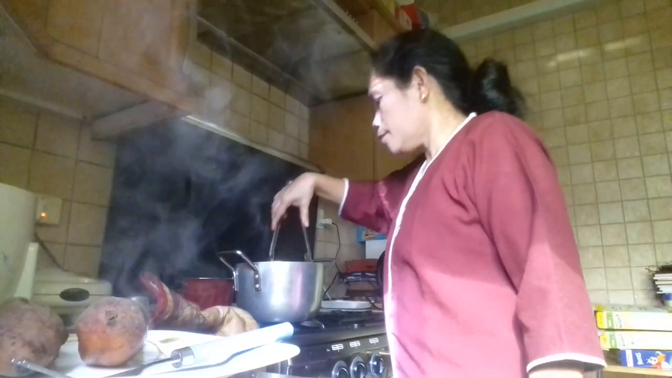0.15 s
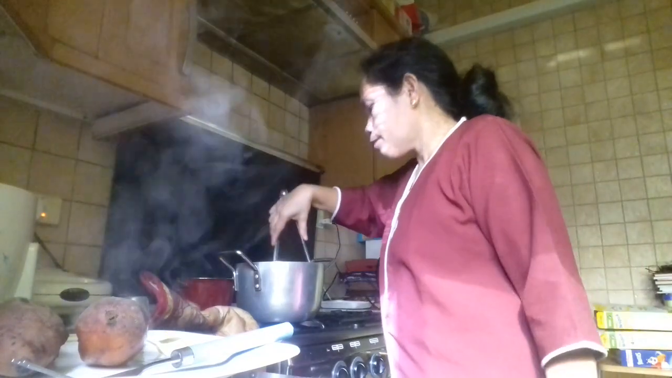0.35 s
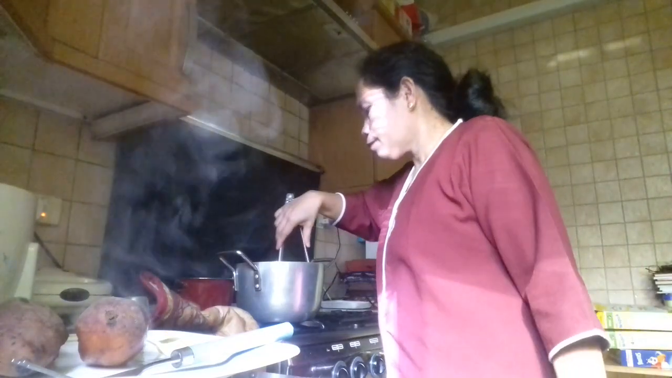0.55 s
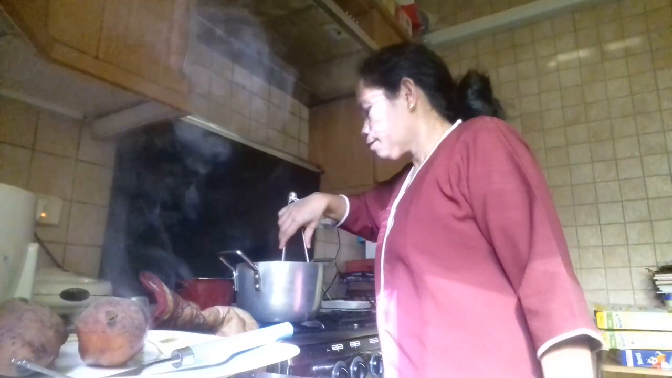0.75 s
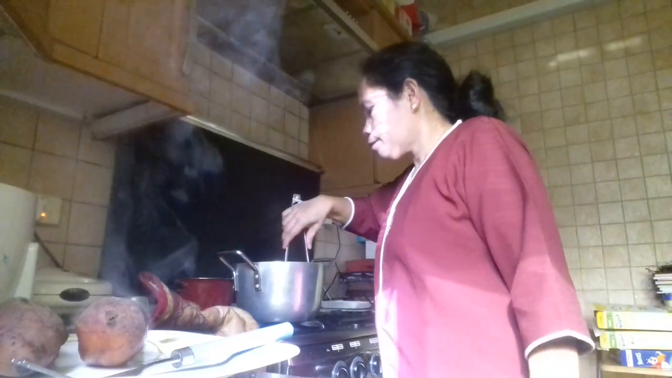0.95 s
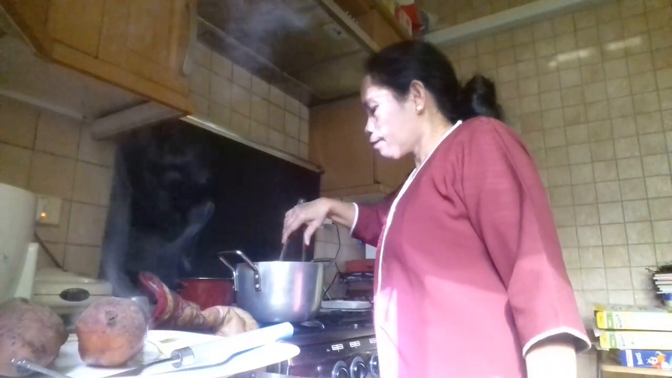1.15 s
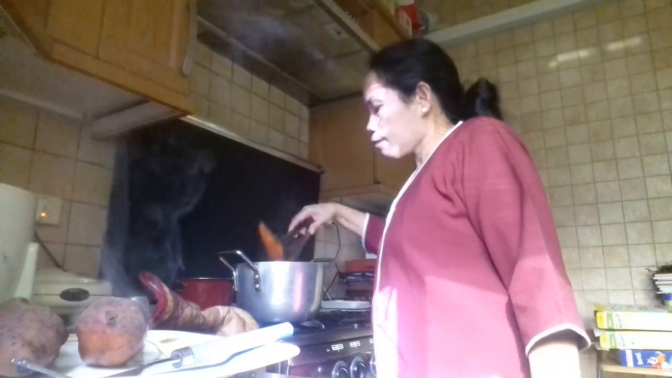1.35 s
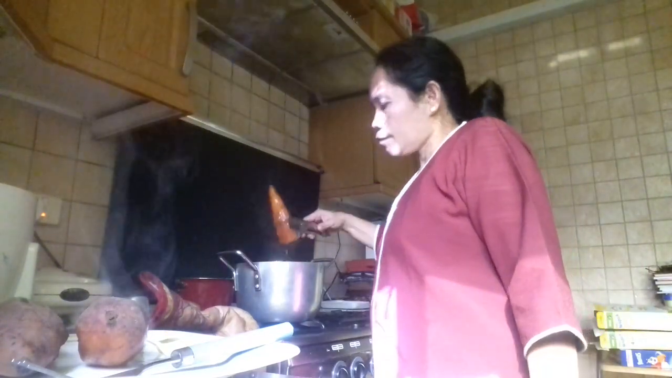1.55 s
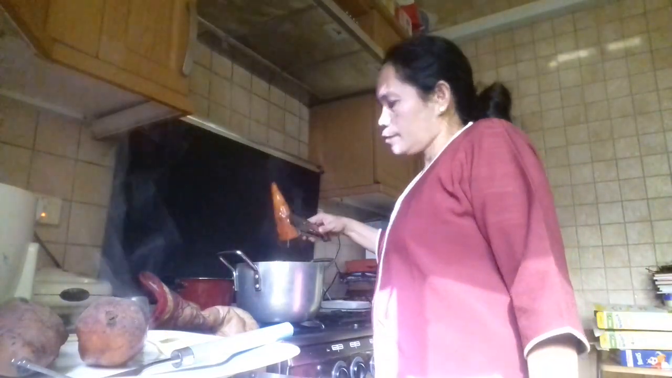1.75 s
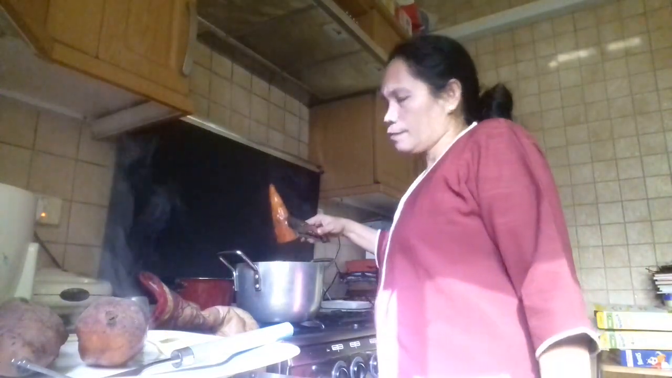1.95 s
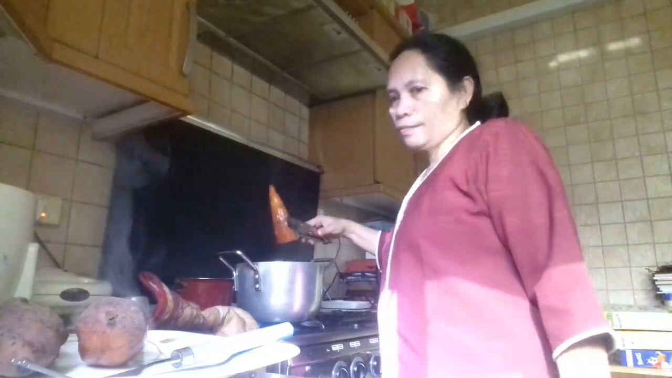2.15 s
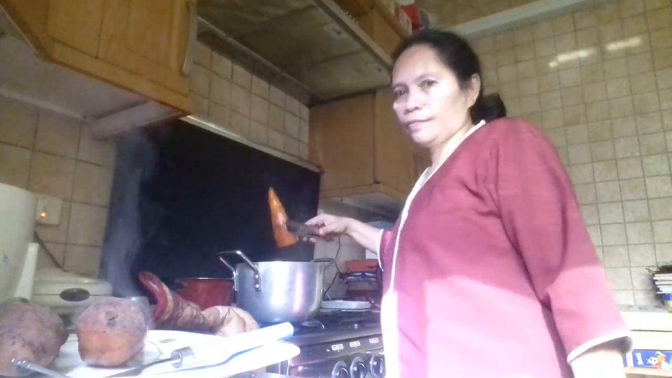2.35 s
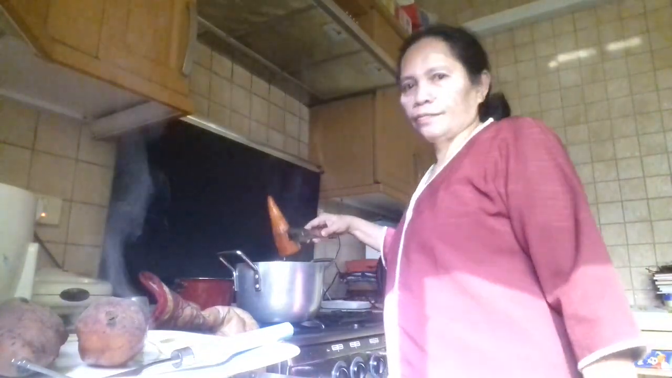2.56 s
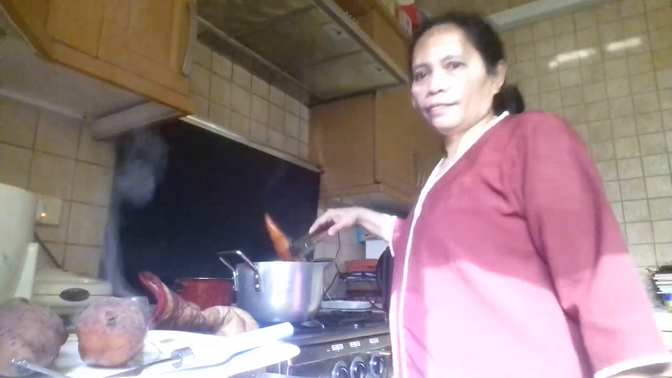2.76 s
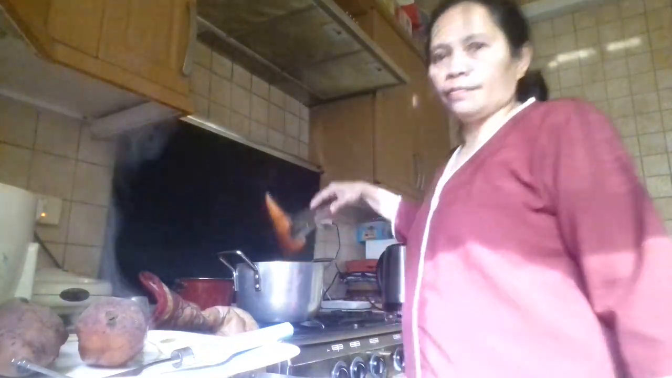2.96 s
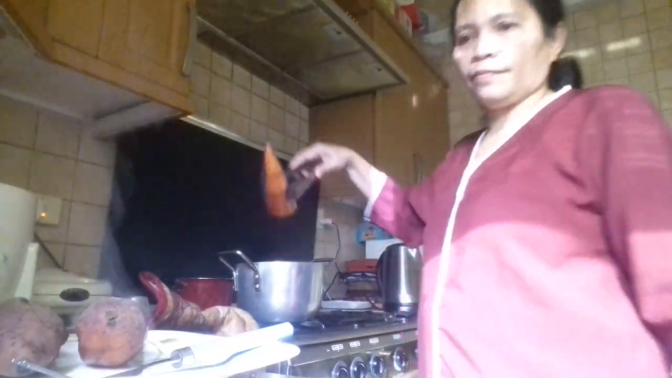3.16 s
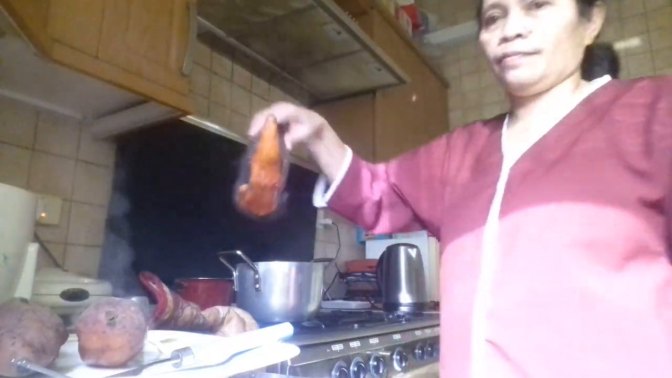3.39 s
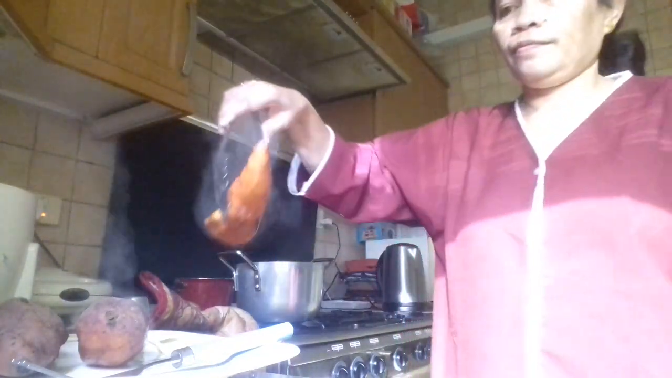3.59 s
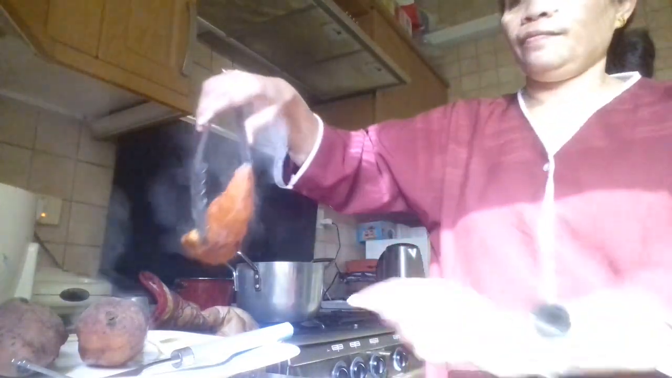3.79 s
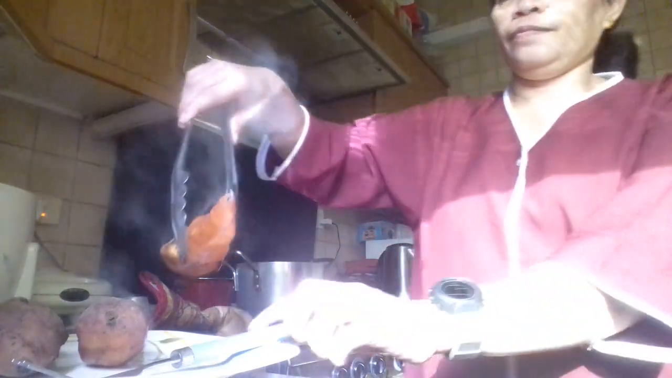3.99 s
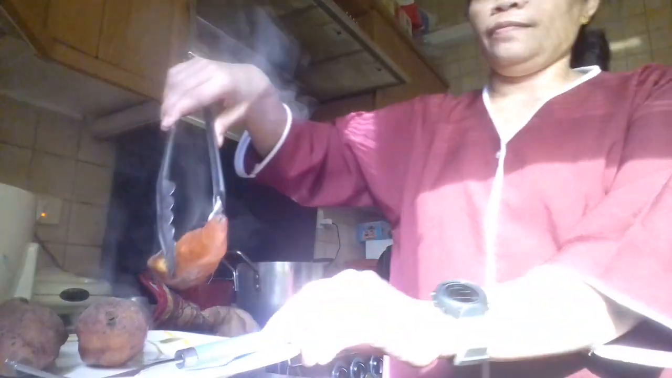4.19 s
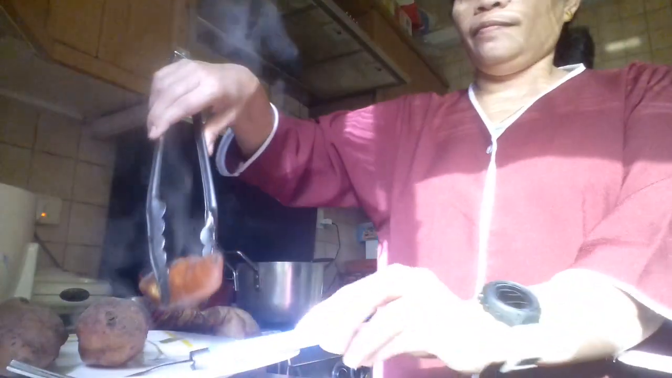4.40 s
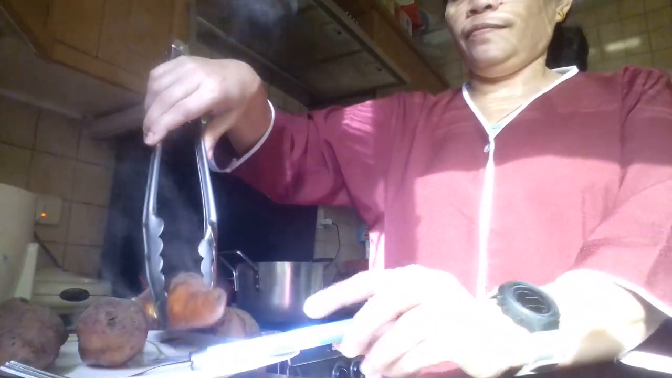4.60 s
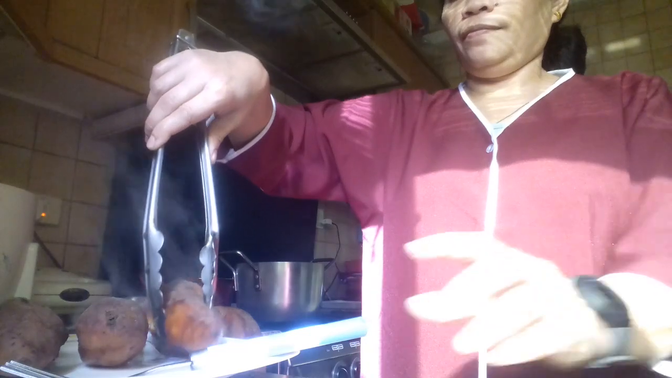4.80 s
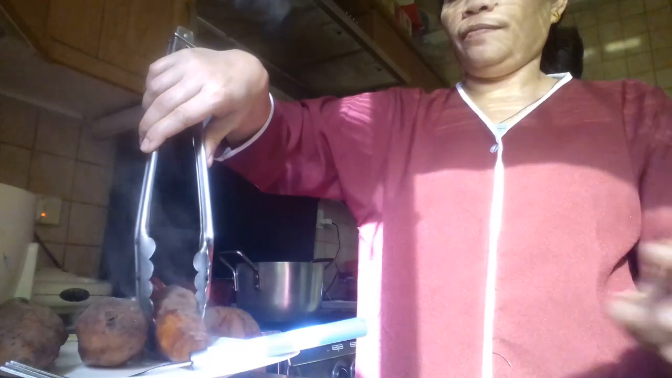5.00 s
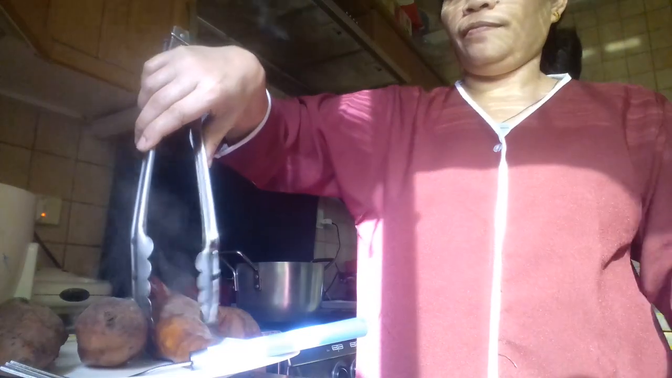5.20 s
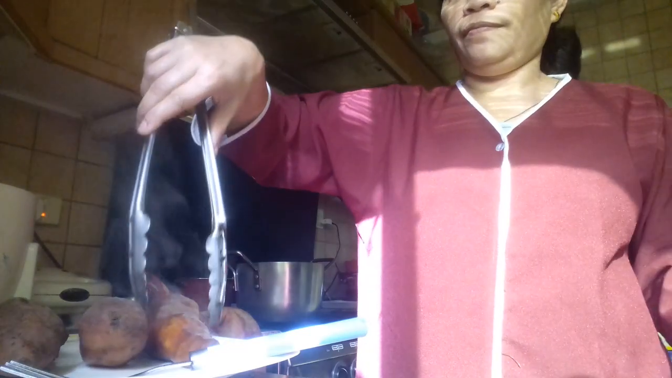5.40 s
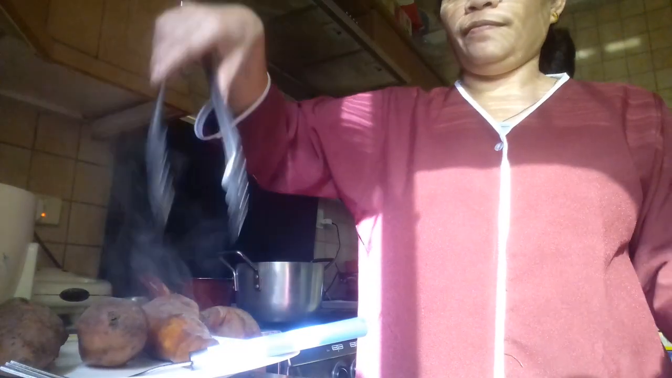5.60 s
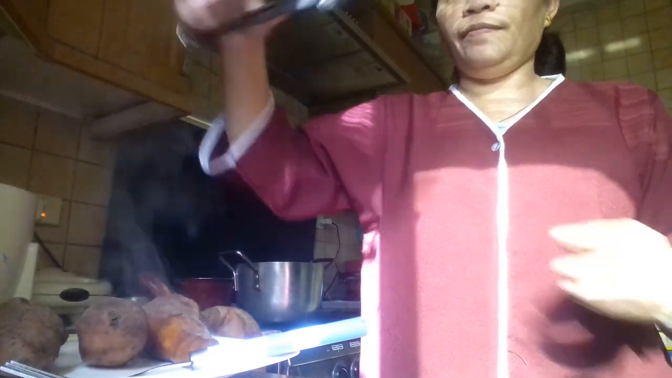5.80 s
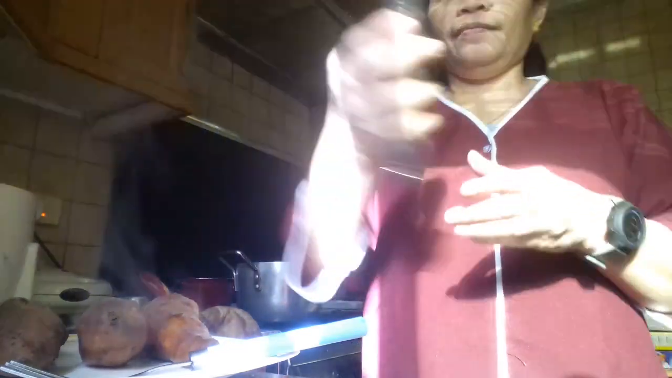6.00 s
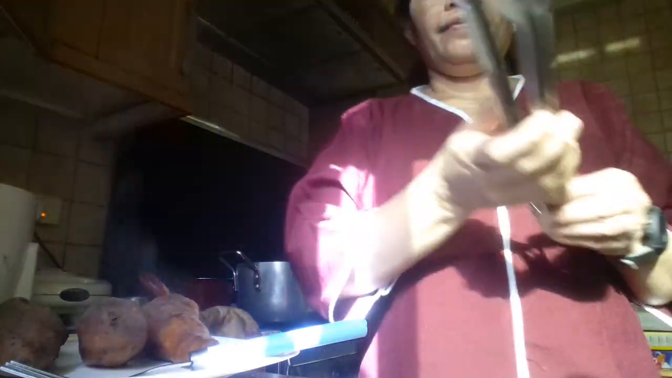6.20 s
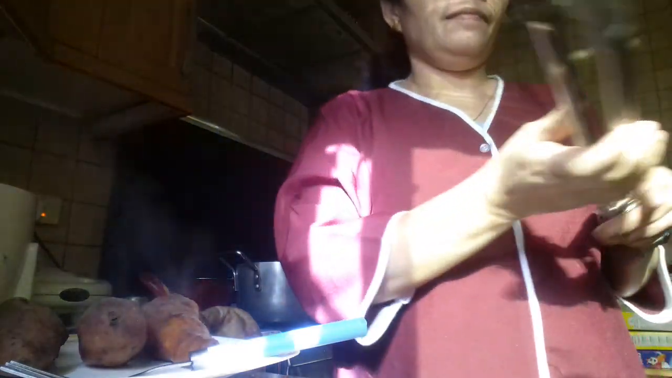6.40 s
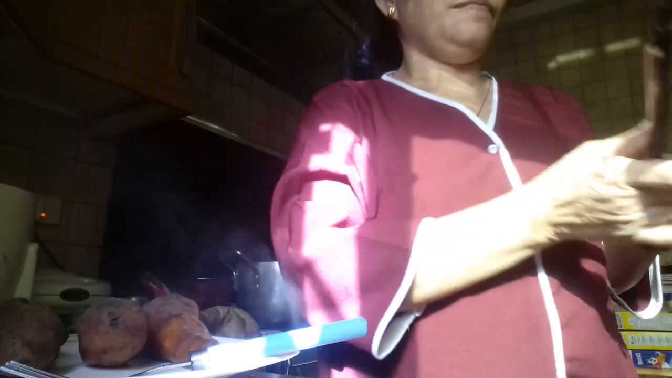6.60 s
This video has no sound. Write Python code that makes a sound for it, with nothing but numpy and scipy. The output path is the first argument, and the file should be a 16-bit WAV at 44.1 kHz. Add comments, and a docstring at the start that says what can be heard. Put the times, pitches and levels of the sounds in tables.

```python
"""A low hum and a soft hiss lie under all, with a faint rustle. First, steel tongs grope in a pot of hot water.
Something knocks dully near the stove; a hand slides a plate on the counter; food and tong tips land on it.
Last, the tongs are snapped shut and rattle. Each blow sums ringing modes, noisy clatter and a bright crack,
and a small hard kitchen answers it; the slide and the background are shaped noise."""
import sys
import numpy as np
from scipy import signal
from scipy.fft import rfft, irfft, next_fast_len
from scipy.io import wavfile
from scipy.ndimage import map_coordinates

SR = 44100
rng = np.random.default_rng(int(sys.argv[2]) if len(sys.argv) > 2 else 0)


def waveform_to_disk(signal):
    """Save audio, clipped to [-1, 1], as 16-bit WAV at the path in sys.argv[1]."""
    frames = np.transpose(np.atleast_2d(signal))
    scaled = np.clip(frames, -1, 1) * 32767
    samples = np.round(scaled).astype(np.int16)
    wavfile.write(sys.argv[1], SR, samples)


N = 293265

# Ringing modes of the plate, one column per mode; rows: f/Hz, relative level/dB, t60/s
PLATE_MODES = [
    [330, 620, 746, 942, 985, 1203, 1540, 1726, 1786, 1948, 1984, 2153, 2524, 2611, 3016, 3049, 3300, 3549,
     3666, 3840, 4247, 4462, 4528, 4850, 5636, 6896, 7052, 7900, 8403, 9959],
    [-25, -22, -19, -14, -17, -22, -21, -7, -9, -15, -16, -24, -13, -11, -17, -14, -24, -17, -1, -22, -21,
     -9, -8, -18, -30, -27, -31, -42, -42, -43],
    [.15, .15, .22, .16, .1, .12, .17, .11, .11, .15, .15, .17, .24, .2, .17, .19, .08, .16, .16, .16, .2,
     .17, .17, .14, .18, .16, .16, .08, .16, .17],
]


def amp(db):
    """Gain of a dB value."""
    return 10 ** (np.asarray(db) / 20)


def unit(x):
    """x scaled to rms 1."""
    return x / np.sqrt(np.mean(x ** 2) + 1e-20)


def along(points, hz):
    """Read a curve of (f/Hz, value) points at hz, in straight lines over log frequency."""
    f, value = np.transpose(points)
    return np.interp(np.log(hz + 1), np.log(f + 1), value)


def filtered(x, response):
    """x with its spectrum multiplied by a response of frequency."""
    n = x.shape[-1]
    padded = next_fast_len(n + 8192)
    spectrum = rfft(x, padded) * response(np.fft.rfftfreq(padded, 1 / SR))
    return irfft(spectrum, padded)[..., :n]


def pair(gain, alike):
    """Stereo noise of rms 1: a mid and a side noise, mixed for the wanted left-right likeness."""
    def mid_side_gain(hz):
        turn = np.arccos(np.clip(along(alike, hz), -1, 1)) / 2
        return gain(hz) * [np.cos(turn), np.sin(turn)]

    mid, side = filtered(rng.standard_normal((2, N)), mid_side_gain)
    return unit(np.array([mid + side, mid - side]))


def background():
    """A wavering hum, noise in a few narrow bands, over a smooth wide hiss."""
    # Hum bands: f/Hz, width/Hz, relative level/dB
    hum_bands = [(101.6, 48, -7.5), (161, 11, -3.5), (179.8, 28.5, 3.5), (209, 18, -9.5)]
    # Hiss spectrum: f/Hz, relative level/dB per Hz
    hiss_curve = [(24, -62), (40, -43), (87, -10.5), (133, -22), (144, -14), (167, 0), (220, -14.5),
                  (433, -13.5), (556, -17), (751, -16.5), (2910, -27.5), (4240, -27.5), (6020, -34),
                  (14800, -36), (16000, -35.5)]
    # Left-right likeness of the hiss: f/Hz, likeness/0-1
    likeness = [(60, 0.75), (180, 0.95), (550, 0.75), (1650, 0.33), (4970, 0.14), (15000, 0.064)]

    def hum_gain(f):
        return sum(amp(db) / (1 + (2 * (f - hz) / width) ** 2) for hz, width, db in hum_bands)

    hum = amp(-67.0) * pair(hum_gain, [(100, 1.0)])  # the same on both sides
    hiss = amp(-64) * pair(lambda f: amp(along(hiss_curve, f)), likeness)
    return hum + hiss


def walls(x):
    """The kitchen's diffuse answer: a new noise tail each time, every frequency dying at its own speed."""
    # Reverberation of the kitchen: f/Hz, t60/s
    room_decay = [(200, 0.49), (2000, 0.26), (6000, 0.34), (14000, 0.44)]
    hz, t, z = signal.stft(rng.standard_normal(SR // 3), SR, nperseg=256)
    fade = amp(-60 * t / along(room_decay, hz)[:, None])
    tail = signal.istft(z * fade, SR, nperseg=256)[1]
    delayed = np.pad(x, (400, 0))  # 9 ms before the first reflection
    return signal.fftconvolve(delayed, tail / np.linalg.norm(tail))


def struck(blows, touch, modes, noise, crack_db, room_db):
    """Each blow rings decaying modes, adds noisy clatter and a crack, and is answered by the walls."""
    medium_db = -40  # blow level at which the clatter settings hold unchanged
    out = np.zeros(N + SR)
    t = np.arange(SR // 3) / SR
    hz, level, t60 = np.array(modes)[:, :, None]
    for start, db, tilt_db, spot_hz, spot_db, rise, free in blows:
        clatter_db, clatter_t60 = np.reshape(touch, (2, 2)) @ [1, db - medium_db]

        def colour_gain(f):
            # where the blow lands tilts its sound and lifts or dips it around one pitch
            spot = np.exp(-(np.log((f + 1) / spot_hz) / 0.072) ** 2)
            return tilt_db * np.log2((f + 50) / 2000) + spot_db * spot

        gain = amp(level + colour_gain(hz))
        after = np.maximum(t - rise, 0)
        damped_t60 = t60 * np.clip(free, .05, 1)  # hand and food damp the ring
        scatter_db = rng.normal(0, 2.2, hz.shape)  # no two blows excite the modes alike
        fade = amp(scatter_db - 60 * after / damped_t60)
        tones = np.sin(2 * np.pi * (hz * t + rng.random(hz.shape)))
        ring = np.sum(gain * fade * tones, axis=0) / np.linalg.norm(gain)

        rattle = unit(filtered(rng.standard_normal(len(t)), lambda f: amp(along(noise, f) + colour_gain(f))))
        bright = unit(filtered(rattle, lambda f: (f / 4000) ** 0.36))
        crack = amp(crack_db - 60 * np.abs(t - rise) / 0.044) * bright  # brief burst where the force peaks
        grain = map_coordinates(rng.standard_normal(100), [t * 200])  # many small contacts, some firmer
        clatter = amp(clatter_db + 1.84 * grain - 60 * after / max(clatter_t60, .01)) * rattle

        contact = np.sin(np.pi / 2 * np.clip(t / max(rise, 1e-4), 0, 1)) ** 2  # the force builds up
        direct = amp(db) * contact * (ring + clatter + crack)
        answer = amp(room_db) * walls(direct)
        first = round(start * SR)
        out[first:][:len(direct)] += direct
        out[first:][:len(answer)] += answer
    return out[:N]


def plate_slide():
    """Sliding plate and rustling sleeves: grainy rubbing noise, coloured by the plate's modes, in strokes."""
    # Rubbing spectrum: f/Hz, relative level/dB per Hz
    rub_curve = [(240, -2), (400, 6.5), (473, -14), (508, 5), (694, 1), (925, 1), (1040, -1), (1250, 2.5),
                 (1680, -1), (2090, -0.5), (2780, -6), (3800, -0.5), (4830, -8), (7000, -34.5), (9100, -46),
                 (15400, -120)]
    # Strokes: peak t/s, level/dB, swell/s, fade/s
    stroke_list = [(.02, -74, .1, 0.23), (1.2, -77.5, 0.33, .3), (3.5, -69, 0.093, .12),
                   (3.9, -55, 0.18, .14), (4.45, -59.5, 0.27, 0.24), (4.85, -62, 0.078, 0.19),
                   (5.6, -78, 0.57, .2), (6.2, -62, 0.31, 0.28), (6.65, -55, 0.11, .1)]
    rest_db, rest_tilt_db, stroke_tilt_db = -77.5, -0.5, 3.5  # rustle between strokes; tilts in dB per octave

    def rub_gain(f):
        plate = sum(amp(level) / np.hypot(1, (f - hz) / 60) for hz, level, _ in zip(*PLATE_MODES))
        return amp(along(rub_curve, f)) * (1 + .5 * plate)

    grain = map_coordinates(rng.standard_normal(N // 600 + 4), [np.arange(N) / 600])
    rub = filtered(rng.standard_normal(N), rub_gain)
    hz, t, z = signal.stft(unit(rub * amp(0.74 * grain)), SR, nperseg=512)
    strokes = sum(amp(db) * np.exp(-((t - peak) / np.where(t < peak, swell, fade)) ** 2)
                  for peak, db, swell, fade in stroke_list)
    octaves = np.log2((hz[:, None] + 50) / 3500)
    gain = strokes * amp(stroke_tilt_db * octaves) + amp(rest_db + rest_tilt_db * octaves)
    return signal.istft(z * gain, SR, nperseg=512)[1][:N]


def stove_knock():
    """Something knocks dully near the stove: low modes with clatter; harder blows clatter less."""
    # Knocks: t/s, level/dB, tilt/dB per octave, favoured f/Hz, favour/dB, rise/s, free ring/0-1
    blows = [(2.062, -64, 3.7, 2280, 14, 0.018, 1), (2.331, -44, 0.22, 1220, 3.8, 0.002, 1)]
    # Clatter: level over the ring/dB, change/dB per dB harder, t60/s, change/s per dB harder
    touch = (-10, -.2, 0.4, -.001)
    # Modes, one column each; rows: f/Hz, relative level/dB, t60/s
    modes = [
        [496, 608, 680, 807, 1120, 1195, 1244, 1394, 1744, 1986, 2196, 2400, 2907, 3806],
        [-7, -3, -10, -10, -10, -5, -3, -7, -4, -17, -18, -19, -18, -20],
        [.75, .25, .4, .25, .3, .14, .11, .14, .19, .2, .2, .2, .15, .15],
    ]
    # Clatter spectrum: f/Hz, relative level/dB per Hz
    noise = [(150, -53), (250, -29), (402, -35), (502, 5.5), (711, -5), (1230, -2), (7000, -35.5),
             (9100, -72), (15400, -120)]
    return struck(blows, touch, modes, noise, crack_db=-14, room_db=-14)


def pot_groping():
    """Steel tongs grope in the pot: blows ring its modes; firmer contacts ring more cleanly."""
    # Blows: t/s, level/dB, tilt/dB per octave, favoured f/Hz, favour/dB, rise/s, free ring/0-1
    blows = [(.509, -47, 9, 1310, 7.5, 0.0022, 0.6), (.581, -44.5, 3.5, 656, 7, 0.0037, 0.66),
             (.612, -50, -2, 650, 12, 0.0035, 0.2), (.686, -69, 2, 4300, 1, .0029, 0.5),
             (.782, -40, -2, 788, 13, 0.0055, 1), (.812, -36.5, -0.5, 627, -7, 0.0099, 0.9),
             (.828, -31.5, -0.5, 896, 15.5, 0.014, 0.4), (.856, -36.5, -1, 890, -3, 0.0019, 0.6),
             (.885, -51, 0, 1350, 9, 0.0069, .15), (.929, -36, -1, 653, 9, .011, 0.3),
             (.962, -23.5, -0.5, 635, 11, 0.0133, 0.2), (.992, -31.5, .3, 660, 0.5, 0.0094, 0.28),
             (1.016, -43, 3.5, 1190, 12.5, 0.0099, 0.54), (1.035, -47.5, -7, 1210, 2, 0.0034, .56),
             (1.08, -46.5, -5.5, 630, -16, 0.0065, 0), (1.225, -67, 3.5, 4050, 13, .02, .6)]
    # Clatter: level over the ring/dB, change/dB per dB harder, t60/s, change/s per dB harder
    touch = (-9.5, -0.4, 0.26, .001)
    # Pot modes, one column each; rows: f/Hz, relative level/dB, t60/s
    modes = [
        [409, 552, 620, 657, 688, 797, 870, 991, 1130, 1200, 1300, 1688, 2280, 2729, 3575, 4011, 4185, 4587,
         4705, 4791, 5300, 6370],
        [-15, -14, -5, -1, -5, -13, -9, -19, -19, -9, -9, -15, -21, -26, -23, -21, -24, -23, -22, -23, -28, -33],
        [.2, .2, .12, .12, .12, .15, .2, .2, .2, .25, .25, .2, .2, .2, .15, .2, .2, .15, .15, .15, .15, .15],
    ]
    # Clatter spectrum: f/Hz, relative level/dB per Hz
    noise = [(88, -50), (150, -16.5), (193, -9), (297, -23), (406, -14.5), (484, -18), (637, -4),
             (960, -28), (1210, -4), (1530, -17.5), (3100, -23), (4670, -23.5), (5910, -35.5), (16000, -68)]
    return struck(blows, touch, modes, noise, crack_db=-26.5, room_db=-6.0)


def plate_landing():
    """Food and tongs land on the plate: its modes ring under strong clatter; firmer blows ring more cleanly."""
    # Blows: t/s, level/dB, tilt/dB per octave, favoured f/Hz, favour/dB, rise/s, free ring/0-1
    blows = [(4.146, -50, -4, 1020, 27, 0.005, 0.18), (4.167, -42, -4, 4560, 10, 0.00014, 0.57),
             (4.398, -59, 2, 3040, 3, .004, .45), (4.4365, -30.5, 1, 3100, 12, 0.0017, 0.45),
             (4.469, -19.5, 0.34, 3690, 4, .0033, 0.65), (4.498, -35.5, -1.5, 935, 5, 0.01, 0.39),
             (4.615, -54, -5.5, 790, 9.3, 0.012, 0.69), (5.277, -41.5, -4, 780, 7.7, 0.0015, 1),
             (5.305, -38.5, -0.5, 1740, 5.5, .0044, 1)]
    # Clatter: level over the ring/dB, change/dB per dB harder, t60/s, change/s per dB harder
    touch = (-2.3, -0.1, 0.089, -.002)
    # Clatter spectrum: f/Hz, relative level/dB per Hz
    noise = [(120, -56), (200, -23), (843, -13.5), (951, -17), (1150, -17), (1730, -3), (2090, -12.5),
             (2570, -10.5), (3260, -7.5), (3680, -5.5), (3940, -19), (4520, -6.5), (5180, -23.5),
             (7060, -42), (12000, -68), (15600, -98), (22000, -120)]
    return struck(blows, touch, PLATE_MODES, noise, crack_db=-35.0, room_db=-12)


def tong_tips():
    """Tong tips touch the plate: the open tongs ring in their own high modes."""
    # Touches: t/s, level/dB, tilt/dB per octave, favoured f/Hz, favour/dB, rise/s, free ring/0-1
    blows = [(5.277, -37, .74, 4100, 3, .003, 0.49), (5.296, -39.5, 1, 7600, 5, 0.0083, 0.37),
             (5.307, -36.5, -.22, 2240, 4.3, 0.0039, .46), (5.335, -42.5, -1.1, 2205, 5.9, 0.0047, 0.3)]
    # Clatter: level over the ring/dB, change/dB per dB harder, t60/s, change/s per dB harder
    touch = (-7.5, 0.5, 0.1, 0)
    # Modes of the open tongs, one column each; rows: f/Hz, relative level/dB, t60/s
    modes = [
        [2110, 2204, 3615, 3870, 4250, 4430, 4920, 5408, 5749, 6207, 6562, 7650, 7757, 8920, 10540, 15210,
         15550],
        [-15, -2, -4, -13, -4, -4, -2, -14, -8, -15, -19, -12, -12, -18, -34, -23, -23],
        [.2, .25, .22, .2, .25, .25, .25, .2, .25, .22, .2, .09, .09, .25, .1, .12, .12],
    ]
    # Clatter spectrum: f/Hz, relative level/dB per Hz
    noise = [(180, -49), (300, -20), (622, -25), (772, -5), (1430, -32), (1680, 1.5), (1950, -11),
             (2160, -12), (2820, -25), (4330, 2), (5200, -9), (7870, -15), (10100, -32.5), (15800, -35)]
    return struck(blows, touch, modes, noise, crack_db=-11.5, room_db=-10.5)


def tong_snap():
    """The tongs snap shut and rattle: short, dense modes of the closed steel with clatter."""
    # Blows: t/s, level/dB, tilt/dB per octave, favoured f/Hz, favour/dB, rise/s, free ring/0-1
    blows = [(5.848, -46, 1, 2660, 23, 0.0018, 1), (5.865, -36.5, 2.5, 2500, 20.5, .008, 0.47),
             (5.882, -45.5, 4.5, 4030, 7.8, .002, .9), (5.924, -34, 1.3, 3500, 4.5, .0013, 0.34),
             (6.161, -17, -0.9, 2040, 3, .005, 0.25), (6.18, -36, 0.5, 3780, 1.6, 0.021, 1),
             (6.209, -27, 4, 3500, 3, 0.0088, 0.29), (6.235, -48, 3.5, 4500, 2.2, 0.0052, .55),
             (6.285, -50, -0.5, 4000, 3.6, .0033, 0.79), (6.361, -46.5, -1.7, 2520, 8.7, 0.008, 0.73),
             (6.378, -53, 0, 7100, 5.4, 0.0072, .97), (6.404, -42.5, -4, 2540, 9.6, .00068, 0.89),
             (6.424, -44, -5, 4430, 5, 0.0069, 0.46), (6.507, -28.5, -1.5, 4390, 10.4, 0.0026, 0.46),
             (6.531, -42.5, -0.5, 4000, 1.5, .0038, 0.85), (6.547, -33, -2, 4520, 12, .0043, 0.43),
             (6.566, -40.5, -4, 3880, 4.7, .0086, 0.5), (6.59, -47, -4, 2160, 14, 0.0076, .95)]
    # Clatter: level over the ring/dB, change/dB per dB harder, t60/s, change/s per dB harder
    touch = (-7, -0.224, 0.1145, 0.0029)
    # Modes of the shut tongs, one column each; rows: f/Hz, relative level/dB, t60/s
    modes = [
        [964, 1992, 2100, 2505, 2620, 2960, 3420, 3570, 3825, 3980, 4100, 4200, 4345, 4535, 4640, 4970, 5120,
         5315, 5700, 6432, 6907, 7224, 7628, 8050, 8414, 9450, 13300, 15290],
        [-26, -13, -20, -16, -20, -17, -12, -11, -3, -4, -6, -5, -2, -1, -4, -7, -6, -5, -11, -13, -16, -16,
         -15, -12, -15, -22, -29, -31],
        [.06, .08, .1, .08, .07, .06, .08, .08, .1, .09, .09, .09, .1, .1, .09, .09, .1, .11, .09, .11, .09,
         .09, .07, .08, .09, .06, .04, .05],
    ]
    # Clatter spectrum: f/Hz, relative level/dB per Hz
    noise = [(240, -57), (500, -24.5), (1000, -21), (1600, -14.5), (1990, -11), (2800, -10), (3450, 0),
             (4480, -1), (5400, -13.5), (5950, -8.5), (6500, -5), (8280, -9.5), (9080, -16.5), (11000, -27),
             (15800, -31)]
    return struck(blows, touch, modes, noise, crack_db=-13.0, room_db=-9.5)


def scene():
    """All contacts sit in the middle; only the background is wide."""
    contacts = pot_groping() + stove_knock() + plate_landing() + tong_tips() + tong_snap()
    return contacts + plate_slide() + background()


def record(dry):
    """The microphone dips around 3.2 kHz; nothing is kept above the band limit."""
    top_hz = 15830

    def colour(hz):
        dip_db = -3.5 * np.exp(-((hz - 3200) / 300) ** 2)
        return amp(dip_db) * (hz < top_hz)

    return filtered(dry, colour) - .0005  # the converter sits slightly off zero


dry = scene()
out = record(dry)
waveform_to_disk(out)
```